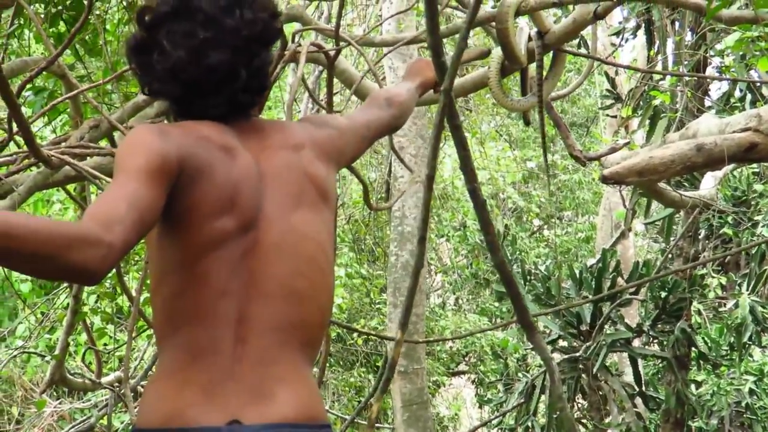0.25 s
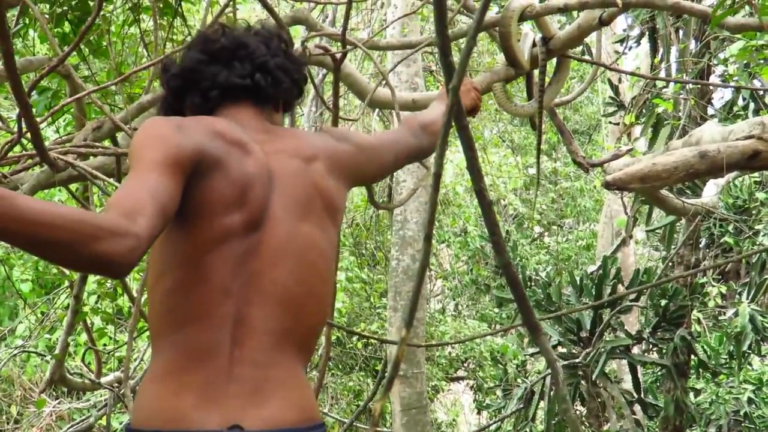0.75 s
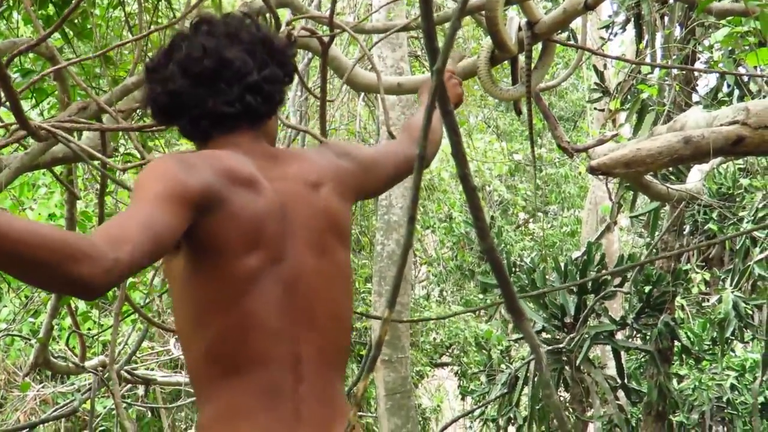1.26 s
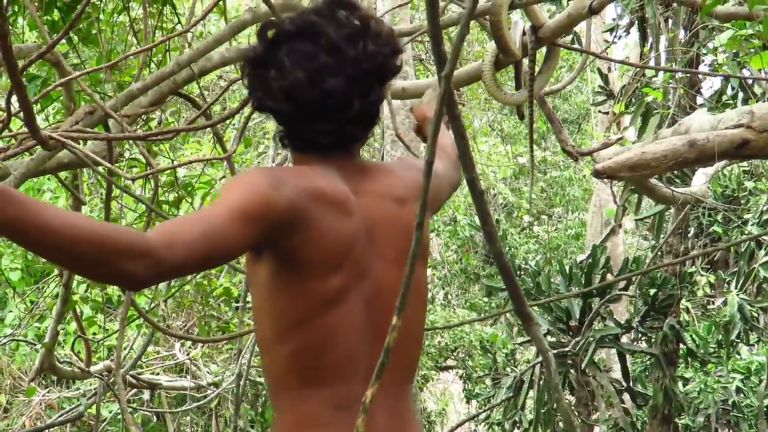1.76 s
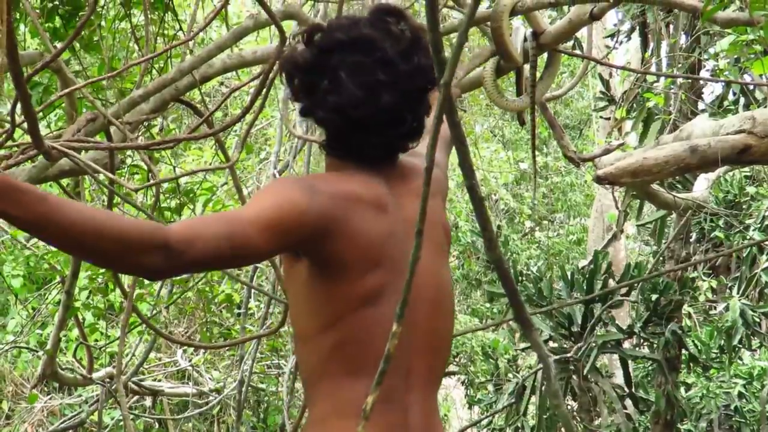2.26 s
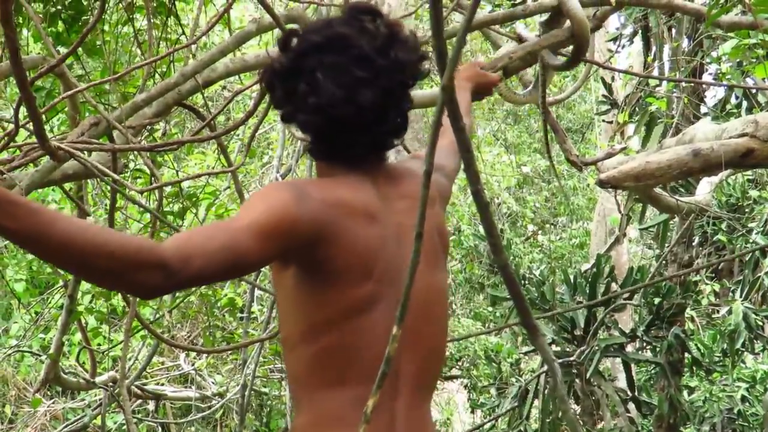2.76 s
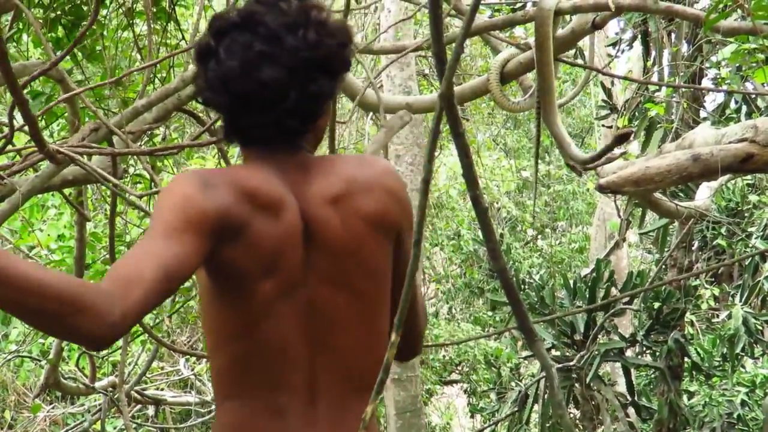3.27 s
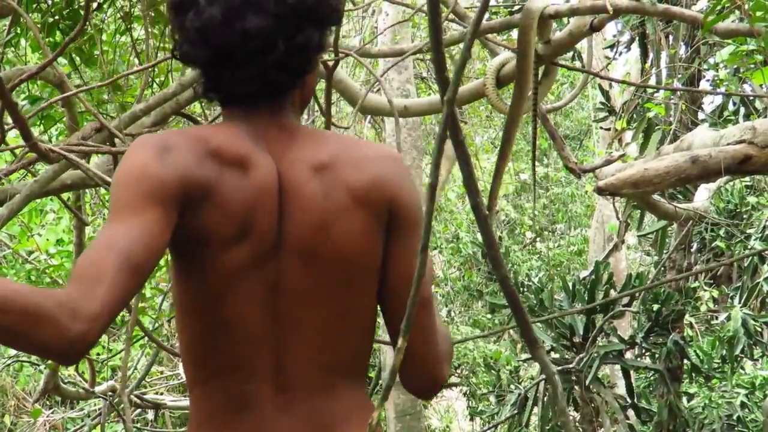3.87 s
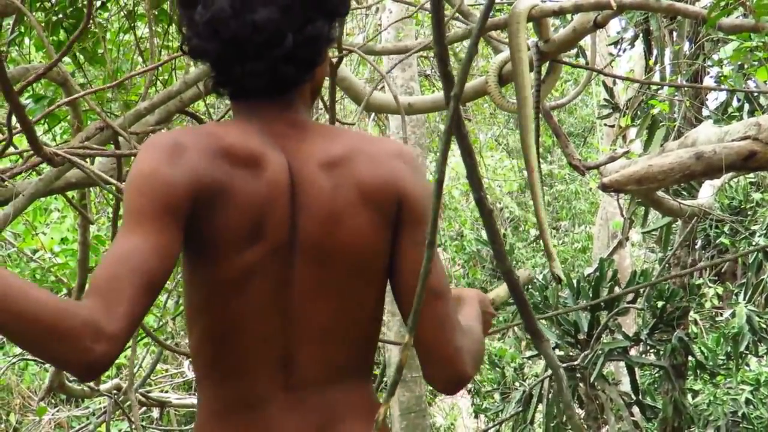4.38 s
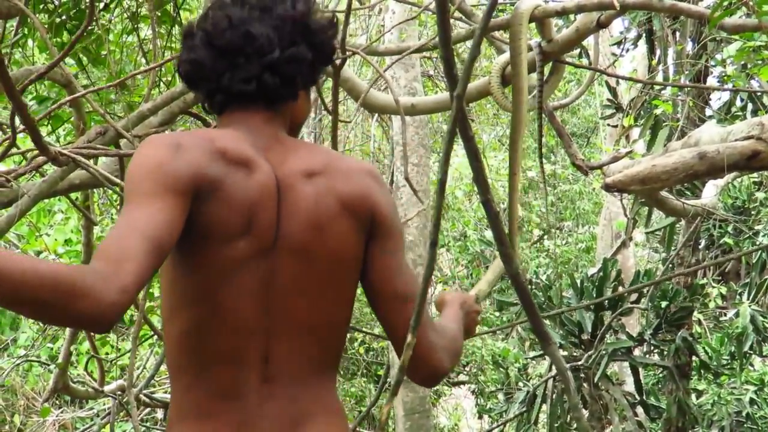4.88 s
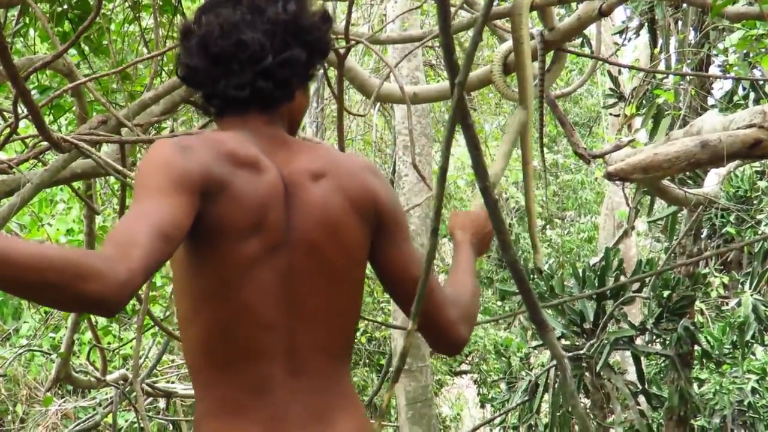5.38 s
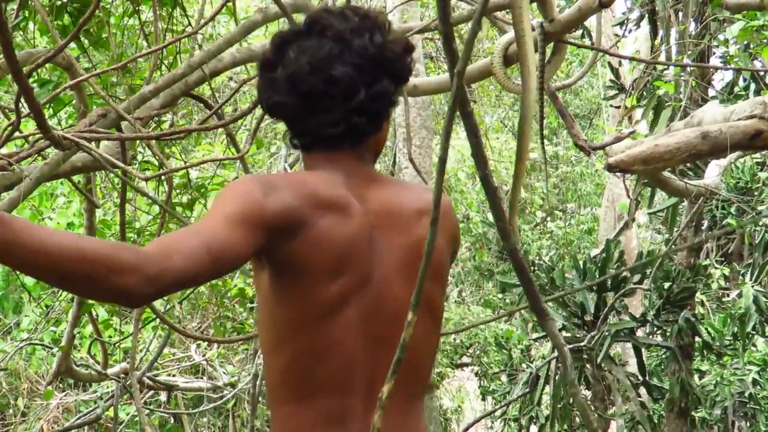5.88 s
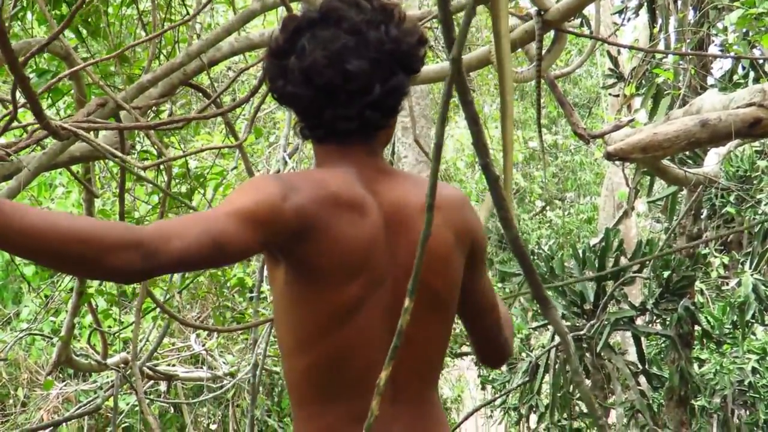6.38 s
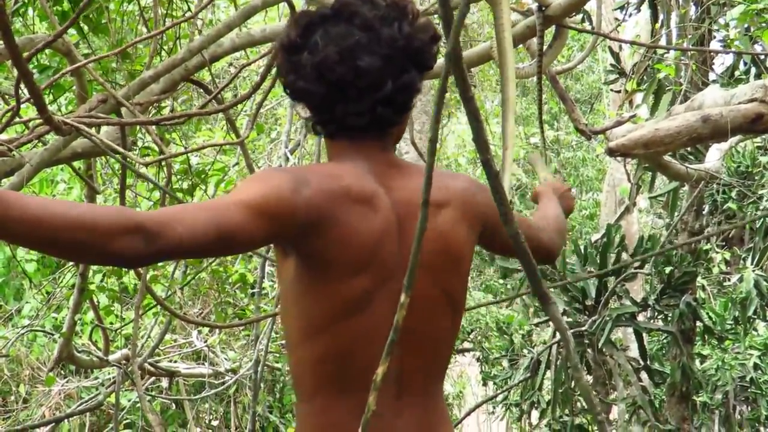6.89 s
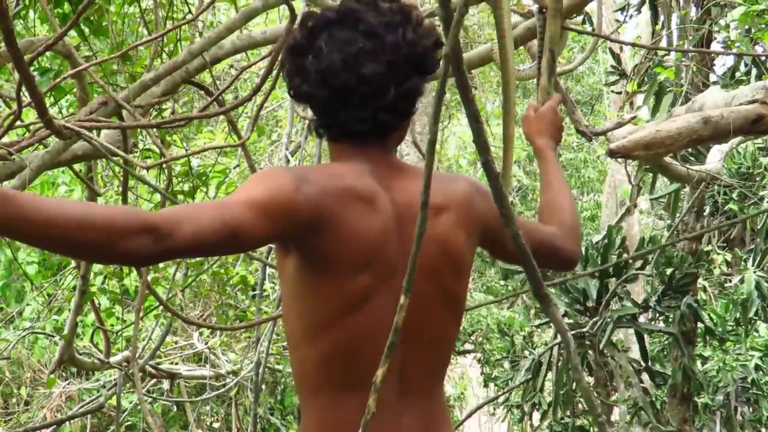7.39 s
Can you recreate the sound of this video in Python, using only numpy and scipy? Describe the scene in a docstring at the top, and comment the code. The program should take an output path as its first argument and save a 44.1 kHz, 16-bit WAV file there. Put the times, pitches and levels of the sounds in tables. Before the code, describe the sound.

Twigs snap and leaves rustle as vines are pulled in a quiet forest; a stem tears, a dry branch cracks sharply, birds whistle faintly.

```python
"""Vines are pulled in a quiet forest: leaf contacts rustle as clumped random impulses, twigs and a tearing stem
snap as runs of fibre breaks exciting wood resonances, and later a dry branch cracks close by as pulses
and decaying modes. Dull bumps are short damped tones. Birds whistle as gliding sines partly scattered by
the trees. Behind them lie a far-off roar of resonant filtered noise and a faint wavering hum."""
import sys
import numpy as np
from scipy import signal
from scipy.fft import rfft, irfft
from scipy.io import wavfile
from scipy.ndimage import uniform_filter1d

SR = 44100
rng = np.random.default_rng(int(sys.argv[2]) if len(sys.argv) > 2 else 0)


def transcribe(u):
    """Save the signal u as a 16-bit wav file named by the first command-line argument.

    u: samples, shape (n,) or (channels, n), limited to [-1, 1]; the rate is SR.
    q: integer samples, one column per channel.
    """
    v = np.clip(np.atleast_2d(u).T, -1, 1)
    q = np.round(v * 32767).astype(np.int16)
    wavfile.write(sys.argv[1], SR, q)


N = 337006
TIME = np.arange(N) / SR

# leaves brushing whenever a vine is pulled or let go: start t/s, length t/s, relative level/dB
LEAF_BRUSHES = [(0.558, 0.083, -62), (0.677, 0.024, -59), (1.417, 0.083, -59.5), (1.584, 0.093, -67),
                (2.287, 0.1, -64), (2.603, 0.2, -66.5), (3.1, 0.056, -60), (3.302, 0.68, -63),
                (4.043, 0.39, -70.5), (4.281, 0.064, -50), (4.42, 0.35, -67.5), (4.85, 0.1, -63),
                (5.297, 0.16, -65.5), (5.74, 0.25, -58.5), (6.102, 0.49, -68.5), (6.868, 0.58, -72.5)]


def shaking(stir_db=-77.5, attack_s=0.038, settle_s=0.074):
    """Power addition: independent brushes build up, hold and settle over a constant slight stir."""
    power = np.full(N, amp(stir_db) ** 2)
    for start, length, db in LEAF_BRUSHES:
        attack = np.clip((TIME - start) / attack_s, 0, 1)
        settle = np.exp(-np.maximum(TIME - start - length, 0) / settle_s)
        power += (amp(db) * attack * settle) ** 2
    return np.sqrt(power)


# colour of a leaf contact: f/Hz, relative spectral level/dB
LEAF_COLOUR = [(300, -16), (1500, 5), (3000, 1.5), (5000, 0), (7000, -4), (10000, -8.5), (13000, -9),
               (15000, -19)]


def rustle(shake, level_db=2, per_s=1600, spread_db=0.0, clump_db=2):
    """Shot noise: countless tiny leaf contacts, clumped in level and largely independent at each ear."""
    sizes = amp(spread_db * np.minimum(rng.exponential(1, (2, N)), 5))
    sizes = sizes * rng.choice([-1, 1], (2, N))
    clicks = sizes * (rng.random((2, N)) < per_s / SR)
    both_ears = clicks + 0.32 * clicks[::-1]
    contact = causal(lambda hz: read(LEAF_COLOUR, hz))
    leaves = signal.oaconvolve(both_ears, contact[None], axes=1)[:, :N]
    return evened(leaves) * shake * amp(level_db + clump_db * drift(N, size=900))


# louder twigs giving way: t/s, woody level/dB, relative splinter level/dB, spread of breaks t/s,
# ring f/Hz, ring boost level/dB
TWIG_SNAPS = [(.42, -55, -75, 0.0051, 3970, 8), (.706, -54, -65, 0.0093, 3200, 1),
              (.736, -48.5, -67, 0.0057, 4100, 0), (1.31, -64, -57.5, .003, 4300, 4),
              (1.829, -47.5, -51, 0.013, 4400, 8), (2.172, -50, -50, 0.0036, 3250, 4),
              (2.225, -55, -53.5, .003, 3400, 5), (2.4, -54.5, -52.5, 0.013, 4400, 7),
              (2.4165, -73, -44.5, 0.0018, 4400, 5), (2.427, -46.5, -51, 0.004, 2780, 2),
              (2.719, -70, -52, .0042, 3980, 8), (2.784, -52, -62, 0.011, 3900, 10),
              (3.594, -72, -45.5, 0.0016, 3560, 8), (3.743, -57, -45.5, 0.0025, 3000, 8),
              (3.863, -42.5, -44, 0.0041, 2950, 12), (3.8755, -46, -52, .005, 2700, 3),
              (3.882, -41.5, -48, .004, 4000, 12), (3.935, -51.5, -64, 0.011, 2600, 6),
              (4.196, -50.5, -52.5, 0.01, 2870, 6), (4.261, -51.5, -52.5, 0.0085, 3800, 1),
              (4.301, -45, -58, 0.029, 5100, 7), (4.408, -46, -68, 0.0044, 1750, 9),
              (4.4478, -39.5, -70, 0.00069, 2880, 3), (4.493, -60, -50, .0069, 3020, 10),
              (4.6135, -42.5, -66, 0.0067, 1500, -1), (4.657, -47.5, -73, 0.0094, 1880, 10),
              (4.739, -47.5, -55, .0045, 2400, 7), (4.787, -55.5, -58, 0.0088, 2820, 11),
              (4.861, -68, -47, 0.0028, 3000, 13), (4.8815, -42.5, -60, 0.0053, 2770, 17),
              (4.954, -51, -54.5, 0.0079, 3580, 10), (5.445, -48, -56, .0044, 3040, 4),
              (5.747, -49, -72, 0.015, 2400, 17), (5.778, -49.5, -62, 0.0055, 2800, 3),
              (5.798, -50, -69, .01, 2400, 11), (5.83, -47, -50, 0.0046, 2400, 10),
              (5.841, -37.5, -40.5, 0.0064, 910, 10), (5.849, -40.5, -51, 0.0067, 2410, 7),
              (6.0112, -45, -54, 0.0075, 1150, 9), (6.381, -60, -56, .0018, 5540, 14),
              (6.44, -46.5, -50.5, 0.0032, 5250, 15), (6.539, -54, -73, 0.01, 4220, 9),
              (6.983, -56.5, -63, 0.011, 4020, 13)]
# resonances of the woody stems: f/Hz, width f/Hz, boost level/dB
STEM_RESONANCES = [(1720, 72, 6.5), (2700, 840, 4), (3450, 210, 5.5), (3800, 95, 2.5), (4400, 320, 1.5),
                   (5100, 370, 7)]


def twigs(snaps, fibres_per_s, first, tilt_db, wood_db=0, splinter_db=-4, ring_width=0.11, lead=1.0):
    """Source and filter: runs of breaking fibres excite the stem resonances and spit bright splinters."""
    woody, bright = np.zeros(N), np.zeros(N)
    t = np.arange(-SR // 20, SR // 10) / SR
    # f/Hz, relative level/dB
    wood = [(100, -15), (500, 12.0), (1500, 7.5), (3800, -1.0), (6000, -4.5), (14000, -20)]
    splinter_colour = [(1500, 9.4), (4500, 20.8), (7000, 21.2), (12000, 19.2), (15000, 11.0)]
    splinter = causal(lambda hz: read(splinter_colour, hz))
    for s, body_db, tick_db, spread, ring_hz, ring_db in snaps:
        # a few fibres go early, then the rest let go together
        early = .5 * np.exp(-abs(t) / (lead * spread))
        strain = np.where(t < 0, early, np.exp(-(t / spread) ** 2 / 2))
        broken = rng.random(len(t)) - .5
        fibres = broken * (rng.random(len(t)) < fibres_per_s / SR) * strain
        fibres[t == 0] = first
        # every twig favours one pitch of its own; tilt is in dB per octave away from it
        resonances = list(STEM_RESONANCES) + [(ring_hz, 2 * ring_width * ring_hz, ring_db)]
        body = causal(lambda hz: read(wood, hz) + peaks(resonances, hz).sum(0)
                      - tilt_db * abs(np.log2((hz + 1) / ring_hz)))
        add(woody, s + t[0], at_level(signal.fftconvolve(fibres, body), body_db + wood_db))
        add(bright, s + t[0], at_level(signal.fftconvolve(fibres, splinter), tick_db + splinter_db))
    return woody, bright


def ticks(shake, splinter_db=-4, octaves=0.84, per_s=9, over_db=7, scatter_db=9.5,
          spread_s=0.007, centre_hz=3400, ring_db=14):
    """Poisson process: tiny snaps at random moments follow the leaf motion; rows as in TWIG_SNAPS."""
    rows = []
    for at in np.flatnonzero(rng.random(N) < per_s / SR):
        db = 20 * np.log10(shake[at]) + over_db + scatter_db * rng.uniform(-1, 1)
        ring_hz = centre_hz * 2 ** (octaves * rng.uniform(-1.2, 1))
        rows.append((at / SR, db, db + splinter_db, spread_s, ring_hz, ring_db))
    return rows


# bundles of fibres parting until the stem gives way: t/s, woody level/dB, ring f/Hz, ring boost level/dB
STEM_TEAR = [(4.3166, -40, 3100, 4), (4.3193, -42, 2400, 5), (4.326, -40, 2300, 4), (4.329, -39, 2000, 7),
             (4.3335, -41, 3800, 7), (4.337, -37, 3300, -4), (4.3445, -42, 2700, 3),
             (4.3495, -40.5, 2100, 6), (4.353, -41, 2100, 10), (4.3562, -37, 3400, 8),
             (4.3633, -32, 1830, 17), (4.368, -35.5, 1870, 9), (4.375, -46, 2200, 5)]


def tear(splinter_db=-16, spread_s=0.0021):
    """Progressive fracture: each fibre bundle parts with its own short crack; rows as in TWIG_SNAPS."""
    return [(s, db, db + splinter_db, spread_s, hz, ring_db) for s, db, hz, ring_db in STEM_TEAR]


# breaks of the dry branch: t/s, relative level/dB
BRANCH_BREAKS = [(5.952, -19), (5.9525, -33), (5.9546, 0.5), (5.9569, -18)]
# colour of its crack: f/Hz, relative spectral level/dB
CRACK_COLOUR = [(40, -34), (160, -3.5), (350, 0), (700, 7.5), (1000, -0.5), (1300, 4), (2300, 0),
                (2950, -11), (4000, -3), (4750, -12), (5500, -18), (7000, -17.5), (9500, -22), (15000, -32)]
# its modes of vibration: f/Hz, relative level/dB, decay by 60 dB t/s
BRANCH_MODES = [(403, -35, 0.065), (840, -28, 0.028), (1238, -14.5, 0.036), (2250, -20, 0.019),
                (3900, -24, 0.015), (4400, -31, 0.013), (7300, -39, 0.035)]


def branch(crack_db=-6.5, ring_db=-7, shreds_db=-33, shreds_t60=0.0083, low_cut_hz=90):
    """Impulsive excitation: each break gives a pressure pulse, a modal ring and a spray of shredding fibres."""
    out, t = np.zeros(N), np.arange(SR // 8) / SR
    crack = causal(lambda hz: read(CRACK_COLOUR, hz))
    # f/Hz, relative level/dB
    fizz_colour = [(150, 0), (400, 5), (2100, 18), (3000, -11), (4400, 18), (6000, -14), (13000, 0), (15000, -22)]
    fizz = causal(lambda hz: read(fizz_colour, hz))
    for s, db in BRANCH_BREAKS:
        add(out, s, -amp(db + crack_db) * crack / abs(crack).max())
        add(out, s, -amp(db + ring_db) * ringing(BRANCH_MODES))
        noise = rng.standard_normal(len(t)) * amp(-60 * t / shreds_t60)
        add(out, s, at_level(signal.fftconvolve(noise, fizz), db + shreds_db))
    return signal.sosfilt(signal.butter(2, low_cut_hz, "highpass", fs=SR, output="sos"), out)


def ringing(modes):
    """Modal superposition: exponentially decaying sines."""
    t = np.arange(SR // 6) / SR
    return sum(amp(db - 60 * t / t60) * np.sin(2 * np.pi * hz * t) for hz, db, t60 in modes)


def bending(x, delay_s):
    """Dispersion: bending waves run along the wood treble first; delay_s is the travel time at 1 kHz."""
    hz = np.fft.rfftfreq(N, 1 / SR)
    phase = 4 * np.pi * delay_s * np.sqrt(1000 * hz)
    return irfft(rfft(x) * np.exp(-1j * phase), N)


# dull bumps and knocks of shifting weight: t/s, f/Hz, envelope peak level/dB
WEIGHT_BUMPS = [(0.931, 53.7, -54), (.964, 650, -44.5), (2.045, 720, -41.5), (2.238, 810, -40),
                (2.782, 192, -49), (2.797, 876, -38), (3.421, 73, -49)]


def bumps(cycles=1.18):
    """Heavily damped oscillation: dull pushes swell and die within a few cycles."""
    out, t = np.zeros(N), np.arange(SR // 4) / SR
    for s, hz, db in WEIGHT_BUMPS:
        age = t * hz / cycles
        add(out, s, amp(db) * age * np.exp(1 - age) * np.sin(2 * np.pi * hz * t))
    return out


# bird whistles: least share scattered by the trees (0-1), list of (t/s, f/Hz, level/dB)
BIRD_WHISTLES = [(0.028, [(2.068, 1703, -51), (2.085, 1737, -41), (2.11, 1750, -46.5), (2.13, 1763, -43.5),
                 (2.16, 1753, -37.5), (2.168, 1580, -51), (2.205, 1120, -51)]), (0.24, [(2.345, 2094, -54),
                 (2.375, 2627, -55), (2.41, 2440, -50.5), (2.46, 2400, -52), (2.515, 2320, -60),
                 (2.53, 2264, -42), (2.565, 2222, -45.5), (2.605, 2167, -57)]), (0.36, [(2.61, 1680, -56),
                 (2.625, 1720, -46), (2.64, 1964, -57), (2.65, 2110, -50), (2.675, 2250, -55)]),
                 (0.096, [(2.835, 2654, -63), (2.91, 2670, -55.5), (2.945, 2700, -61)]),
                 (.1, [(2.915, 2980, -62), (2.97, 2950, -59)]), (0.4, [(2.99, 2390, -53), (3.01, 2410, -54),
                 (3.045, 2290, -60)]), (.02, [(3.012, 1710, -49), (3.03, 1720, -44.5), (3.055, 1740, -43),
                 (3.09, 1705, -44.5)]), (0.61, [(3.1, 1700, -63), (3.19, 1593, -53.5), (3.27, 1418, -55.5),
                 (3.4, 1277, -58)]), (.2, [(3.145, 3000, -57), (3.19, 2970, -60)]),
                 (0.87, [(3.612, 2366, -49), (3.654, 2560, -54)]), (0.13, [(4.462, 1720, -46),
                 (4.5, 1764, -57), (4.52, 1773, -57), (4.535, 1720, -41.5), (4.555, 1640, -60)]),
                 (0.78, [(4.55, 1720, -55), (4.735, 1550, -60)]), (0.53, [(5.155, 2360, -55),
                 (5.18, 2480, -53), (5.215, 2480, -63)]), (.35, [(5.178, 1720, -57), (5.195, 1424, -51),
                 (5.21, 1310, -53)]), (0.6, [(5.21, 2070, -55), (5.225, 2143, -50), (5.245, 1900, -56),
                 (5.35, 1590, -58)]), (.1, [(5.383, 2960, -56), (5.4, 2950, -52), (5.43, 2910, -59)]),
                 (.25, [(5.405, 2760, -51), (5.42, 2580, -51), (5.447, 2560, -52), (5.46, 2270, -53),
                 (5.47, 2080, -48), (5.485, 1875, -57), (5.51, 1650, -57)]), (.2, [(5.47, 2565, -57),
                 (5.52, 2590, -59)]), (0.46, [(5.54, 2770, -57), (5.565, 2830, -55.5), (5.58, 3100, -57),
                 (5.6, 3230, -57)])]


def birds(waver=.004, scatter_waver=0.033, flutter_db=1.7, edge_s=0.0055, hidden_per_db=0.02):
    """Frequency modulation: whistles glide and tremble; leaves hide and blur most their softer parts."""
    direct, hidden = np.zeros(N), np.zeros(N)
    for least_share, points in list(BIRD_WHISTLES) + peeps():
        times, pitches, levels = np.transpose(points)
        t = np.arange(times.min(), times.max(), 1 / SR)
        db = np.interp(t, times, levels)
        share = np.clip(least_share + hidden_per_db * (db.max() - db), 0, 1)
        tremble, flutter = drift((SR // 2, 2), size=130)[:len(t)].T
        hz = np.interp(t, times, pitches) * (1 + (waver + scatter_waver * share ** 2) * tremble)
        edges = np.clip(np.minimum(t - t[0], t[-1] - t) / edge_s, 0, 1)
        note = amp(db + flutter_db * flutter) * edges * np.sin(2 * np.pi * np.cumsum(hz) / SR)
        # the split conserves power
        add(direct, t[0], note * np.sqrt(1 - share))
        add(hidden, t[0], note * np.sqrt(share))
    return direct, hidden


# a small bird's falling run of peeps: start t/s, length t/s, f/Hz approached, level/dB approached
BIRD_PEEPS = [(1.156, .072, 3765, -56.5), (1.298, .038, 3710, -52), (1.398, .045, 3540, -58),
              (1.525, .058, 3490, -61.5)]


def peeps(slide_hz=290, slide_s=0.0185, swell_db=13, scatter=.12):
    """Exponential glide: each peep swells as it slides down towards its pitch; rows as in BIRD_WHISTLES."""
    rows = []
    for s, length, hz, db in BIRD_PEEPS:
        t = np.arange(0, length, .002)
        slide = np.exp(-t / slide_s)
        rows.append((scatter, np.transpose([s + t, hz + slide_hz * slide, db - swell_db * slide])))
    return rows


# colour of the distant roar: f/Hz, relative spectral level/dB
ROAR_COLOUR = [(15, -51), (28, -14.5), (60, -8.5), (118, -2.5), (200, -4), (270, -3), (400, -3.5),
               (750, -8.5), (1080, -16), (1320, -13), (1800, -16), (4000, -24), (12000, -36), (15000, -47)]
# its slow swell: t/s, relative level/dB
ROAR_SWELL = [(0, -51.5), (.8, -50.5), (1.8, -50.5), (2.74, -48.5), (3.74, -50), (4, -51), (4.74, -51.5),
              (5.57, -53.5), (6.06, -51), (6.4, -54), (7.64, -54)]
# its left-right likeness: f/Hz, correlation (-1 to 1)
ROAR_LIKENESS = [(40, 0.78), (80, 0.96), (100, 1), (140, -0.053), (290, -0.5), (520, 0.083), (1400, 0.22),
                 (7000, 0.037), (15000, -0.069)]
# its narrow resonances: f/Hz, width f/Hz, mean boost level/dB
ROAR_DRONES = [(335.7, 24.4, 10.5), (426.2, 9.5, 8), (575, 73, 4), (693, 28, 4), (808, 164, 6.5),
               (1022, 62, 7), (1226, 140, 4), (1317, 27, 4.5)]


def roar(level_db=3, patchy_db=2.0, follow=0.33, drone_waver=0.2, drone_follow=0.092, gust_db=1.0):
    """Diffuse field: partly correlated noise with wavering resonances and a slowly swelling middle band."""
    hz, t = np.fft.rfftfreq(4096, 1 / SR), np.arange(N // 1024 + 5) * 1024 / SR
    a, b, c, d = rng.standard_normal((4, len(t), len(hz)))
    same, left = np.clip(read(ROAR_LIKENESS, hz), -1, 1), a + 1j * b
    z = np.array([left, same * left + np.sqrt(1 - same ** 2) * (c + 1j * d)])
    swell = np.interp(t, *np.transpose(ROAR_SWELL))
    swing = swell - swell.mean()
    gusts = gust_db * drift(len(t), size=3)  # quick lumps of wind in the far treetops
    middle = np.exp(-np.log((hz + 1) / 800) ** 2 / 3)
    patches = evened(uniform_filter1d(drift(a.shape, size=3), size=16, axis=1))
    waver = drone_waver * np.tanh(drift((len(t), len(ROAR_DRONES)), size=12))
    strength = 1 + drone_follow * swing[:, None] + waver
    drones = strength @ peaks(ROAR_DRONES, hz)
    movement = np.outer(follow * swing + gusts, middle)
    z *= amp(read(ROAR_COLOUR, hz) + drones + movement + patchy_db * patches)
    noise = signal.istft(z.transpose(0, 2, 1), nperseg=4096, noverlap=3072)[1][:, :N]
    return amp(swell.mean() + level_db) * evened(noise)


def hum(centre_hz=80, level_db=-65, waver=0.04, flutter_db=3):
    """Random modulation: one low sine wavers in frequency and level about its centre."""
    turns = np.cumsum(centre_hz * (1 + waver * drift(N, size=3000))) / SR
    level = amp(level_db + flutter_db * drift(N, size=4000))
    return level * np.sqrt(2) * np.sin(2 * np.pi * turns)


def smeared(x, share=.7, size=90):
    """Multipath scattering: treble glances off the nearest leaves and reaches each ear by other paths."""
    share = np.clip(share, 0, 1)
    paths = rng.standard_normal((2, size)) * np.linspace(1, 0, size)
    paths /= np.linalg.norm(paths, axis=1, keepdims=True)
    return np.sqrt(1 - share) * x + np.sqrt(share) * signal.oaconvolve(x[None], paths, axes=1)[:, :N]


def echoes(x, t60, colour, start):
    """Reverberant decay: sparse random-sign taps, independent at each ear, each band dying at its own speed."""
    taps = rng.choice([-1., 1.], (2, SR)) * (rng.random((2, SR)) < .2)
    hz, t, z = signal.stft(taps, SR, nperseg=256)
    decay = np.maximum(read(t60, hz), .01)[:, None]
    gain = amp(read(colour, hz)[:, None] - 60 * t / decay) / np.sqrt(decay)
    tail = signal.istft(z * gain, SR, nperseg=256)[1]
    tail *= np.sqrt(np.log(1e6) / (.2 * SR))  # evens out tap density and decay time
    delayed = np.pad(tail, ((0, 0), (int(abs(start) * SR), 0)))
    return signal.fftconvolve(x[None], delayed, axes=1)[:, :N]


# stereo spread of the foliage scatter: f/Hz, side level/dB
SCATTER_WIDTH = [(250, -8), (1200, -15), (4000, -11), (8000, -8.5), (13000, 3.5)]


def narrowed(pair):
    """Mid-side decomposition: the side signal is weighted band by band."""
    mid = pair.mean(0)
    side_gain = amp(read(SCATTER_WIDTH, np.fft.rfftfreq(N, 1 / SR)))
    return mid + irfft(rfft(pair - mid) * side_gain, N)


def amp(db):
    """Level definition: decibels to amplitude gain."""
    return 10 ** (np.asarray(db) / 20)


def evened(x):
    """Normalisation: scales to an rms of one."""
    return x / np.sqrt(np.mean(x ** 2) + 1e-20)


def at_level(sound, db):
    """Short-time level: sets the rms of the loudest four milliseconds."""
    return amp(db) * sound / np.sqrt(uniform_filter1d(sound ** 2, size=180, mode="constant").max())


def read(points, hz):
    """Interpolation: reads a table on a log-frequency axis."""
    f, value = np.transpose(points)
    return np.interp(np.log(hz + 1), np.log(f + 1), value)


def peaks(table, hz):
    """Resonance curves: bell-shaped boosts in dB, one row each."""
    return np.array([db / (1 + (2 * (hz - f) / width) ** 2) for f, width, db in table])


def causal(db, size=2048):
    """Minimum phase: the sharpest impulse response with the gain db(hz)."""
    log_gain = db(abs(np.fft.fftfreq(size, 1 / SR))) * np.log(10) / 20
    return np.fft.ifft(np.exp(np.conj(signal.hilbert(log_gain)))).real[:size // 2]


def drift(shape, size):
    """Low-pass noise: smooth chance of rms one, averaged twice over size steps."""
    once = uniform_filter1d(rng.standard_normal(shape), size, axis=0)
    return evened(uniform_filter1d(once, size, axis=0))


def add(mix, s, sound):
    """Superposition: mixes a sound in at time s."""
    part = mix[max(round(s * SR), 0):][:len(sound)]
    part += sound[:len(part)]


# colour of the scatter from nearby foliage: f/Hz, relative level/dB
FOLIAGE_COLOUR = [(100, 10), (400, -10), (1000, -6.5), (2500, -2), (4500, 0), (8000, 5.5), (14000, 1.5)]
# its decay by 60 dB: f/Hz, t/s
FOLIAGE_DECAY = [(200, 0.12), (1200, 0.055), (4000, 0.16), (12000, 0.17)]
# decay by 60 dB among the far trunks: f/Hz, t/s
FOREST_DECAY = [(200, 0.91), (2000, 0.81), (5000, 0.82), (12000, .35)]
# the crack thrown back by trunks and leaves around the branch: f/Hz, relative level/dB
BRANCH_SCATTER_COLOUR = [(100, -3), (400, -6), (600, -13), (950, 1.5), (1400, -3.5), (2300, -6),
                         (4300, -4.5), (5500, -2), (7500, 7.5), (10000, 3.5), (14000, 5)]


def scene():
    """Direct and scattered field: near sounds scatter in foliage, birds arrive partly by way of the trees."""
    shake = shaking()
    snapping = twigs(list(TWIG_SNAPS) + ticks(shake), fibres_per_s=1600, first=0.56, tilt_db=2.0)
    tearing = twigs(tear(), fibres_per_s=3500, first=0.41, tilt_db=5.5)
    woody, bright = np.add(snapping, tearing)
    direct, hidden = birds()
    stems = bending(woody, delay_s=0.000888)
    crack = bending(branch(), delay_s=0.00095)
    # inline tables: decay f/Hz, t/s and colour f/Hz, level/dB
    twig_scatter = echoes(stems + bright, FOLIAGE_DECAY, FOLIAGE_COLOUR, start=0.0023)
    crack_decay = [(200, .12), (1200, 0.088), (4000, .11), (12000, 0.17)]
    crack_scatter = echoes(crack, crack_decay, BRANCH_SCATTER_COLOUR, start=0.0027)
    scatter = narrowed(twig_scatter + crack_scatter)
    depth = echoes(stems + crack + bright, FOREST_DECAY,
                   [(200, -58.0), (2500, -19.5), (12000, -38)], start=0.036)
    near_trees = echoes(hidden, [(1700, 0.27), (2600, 0.19), (3800, .25)],
                        [(1700, 0.57), (2500, 0.93), (3800, 0)], start=0.00201)
    far_trees = echoes(direct + hidden, FOREST_DECAY,
                       [(1700, -11.5), (2500, -11.0), (3800, -8)], start=.052)
    vines = stems + crack + smeared(bright, share=1.0) + rustle(shake) + scatter + depth
    return vines + direct + near_trees + far_trees + roar() + hum() + bumps()


def record(dry, edge_hz=14900):
    """Band limitation: a linear-phase low-pass filter removes the highest treble."""
    lowpass = signal.firwin(401, edge_hz, window=("kaiser", 8), fs=SR)
    return signal.oaconvolve(dry, lowpass[None], "same")


dry = scene()
out = record(dry)
transcribe(out)
```